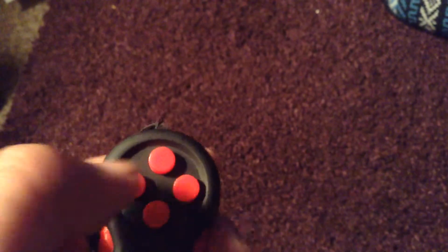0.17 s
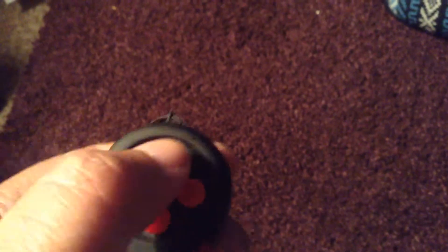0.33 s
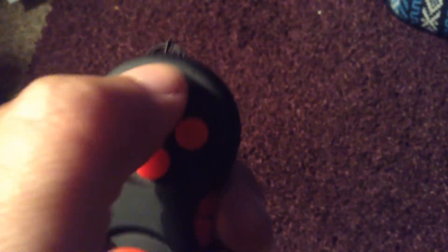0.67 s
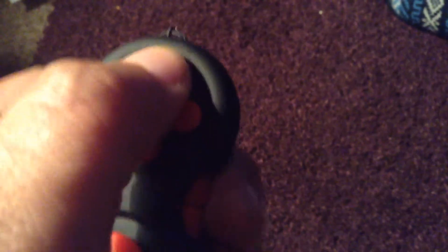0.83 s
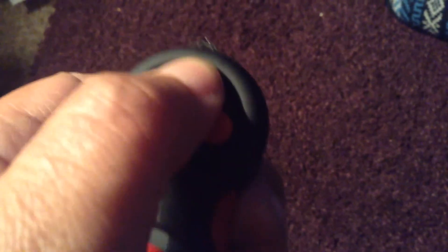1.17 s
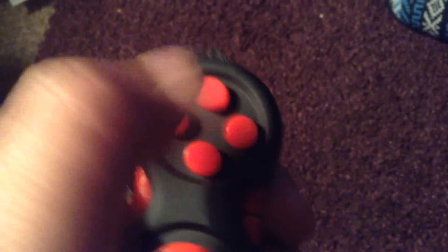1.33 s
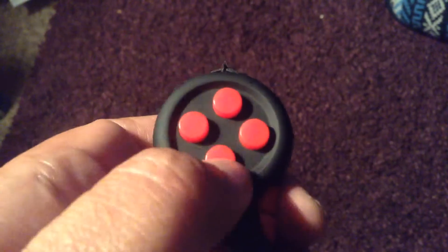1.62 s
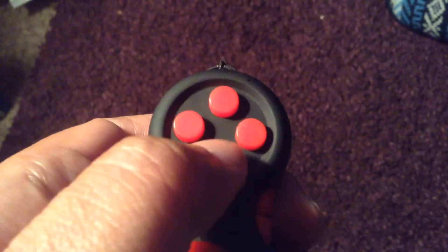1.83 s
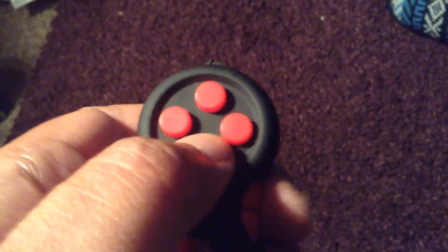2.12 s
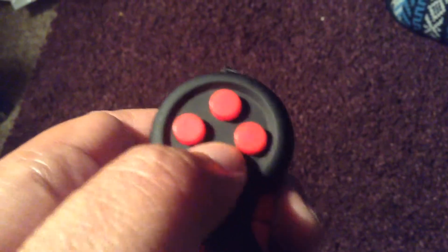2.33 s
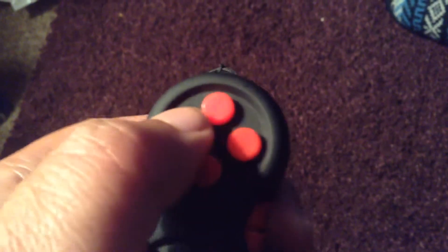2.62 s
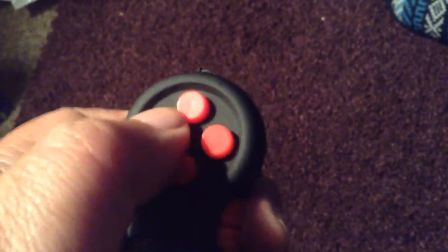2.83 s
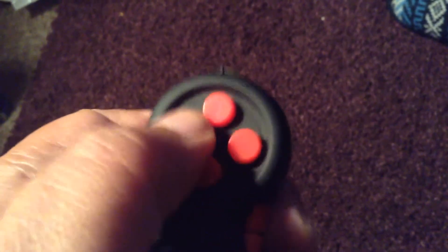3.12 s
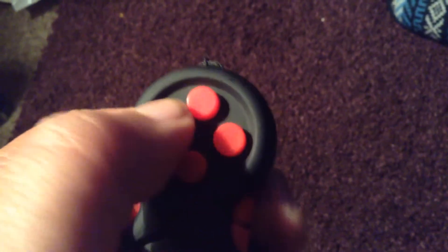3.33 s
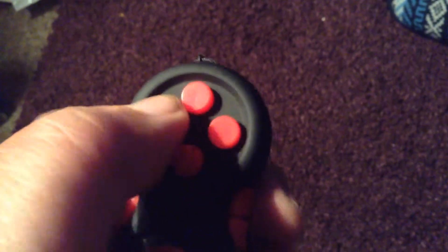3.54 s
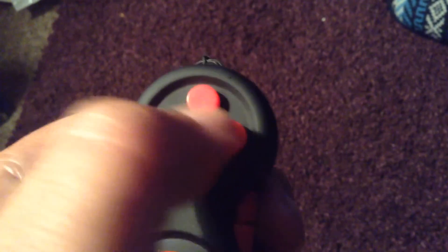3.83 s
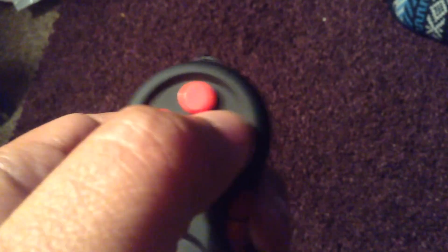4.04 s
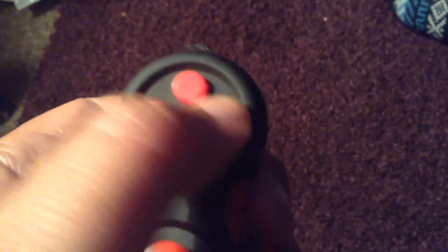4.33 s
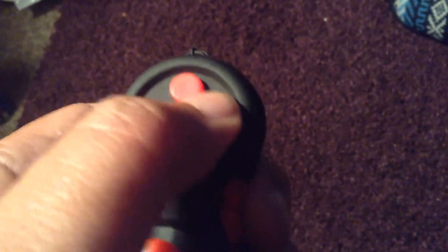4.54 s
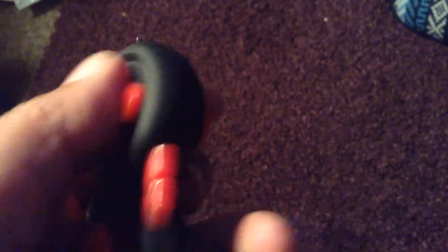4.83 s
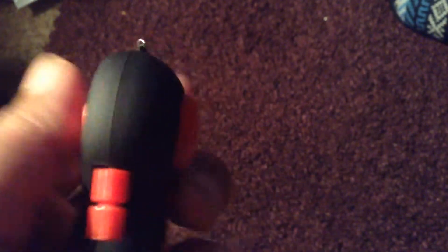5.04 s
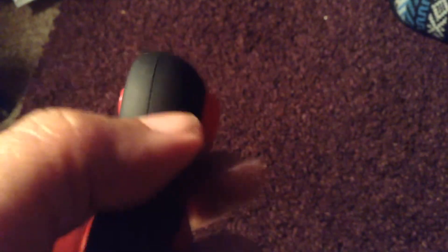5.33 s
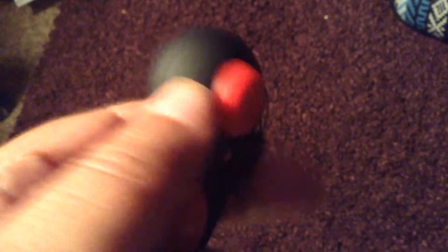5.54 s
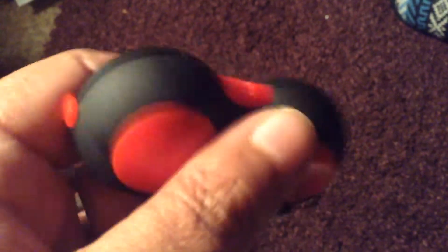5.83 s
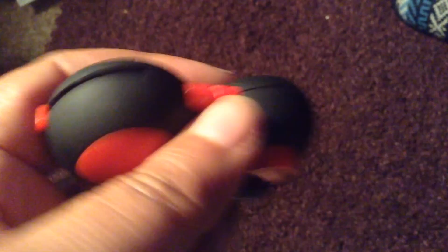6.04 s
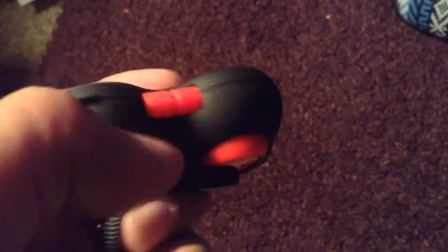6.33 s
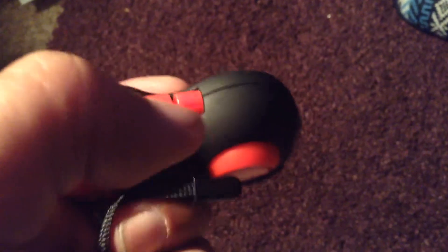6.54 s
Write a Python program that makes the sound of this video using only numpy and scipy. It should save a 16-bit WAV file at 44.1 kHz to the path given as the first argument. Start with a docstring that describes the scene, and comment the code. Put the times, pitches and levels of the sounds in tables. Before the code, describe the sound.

A thumb snaps the plastic buttons of a small hollow toy in sharp uneven clicks, with light ticks and skin rubs, in a quiet room.

```python
"""Fidget toy at close range

A thumb clicks the plastic buttons of a small hand-held toy, close to the microphone in a quiet carpeted room.
Each snap is a brief burst of chattering contact that rings the hollow case; buttons rocking in their seats
tick more lightly, and soft flesh lands on the toy. Skin slides on the case, mostly later on, and once the toy
is turned over its side controls click with hardly any thud. The room answers briefly over a soft steady hiss."""
import sys
import numpy as np
from scipy import signal
from scipy.fft import rfft, irfft, next_fast_len
from scipy.io import wavfile
from scipy.ndimage import uniform_filter1d

SR = 44100
rng = np.random.default_rng(int(sys.argv[2]) if len(sys.argv) > 2 else 0)


def pcm_store(signal):
    """Save signal as 16-bit PCM."""
    levels = np.round(np.clip(np.atleast_2d(signal), -1, 1) * 32767)
    wavfile.write(sys.argv[1], SR, levels.astype(np.int16).T)


N = 294588  # samples
SIZE = 2048  # samples in a short impulse response
HZ = np.fft.rfftfreq(SIZE, 1 / SR)

# steady hiss at the microphone, spectral shape: pitch_hz, relative level_db per Hz
HISS_SHAPE = [(15, -49.5), (25, -47.5), (151, -8), (182, -3), (226, -3), (366, -6), (442, -8.5),
              (492, -6.5), (548, -8.5), (1070, -9.5), (2600, -14), (4450, -14.5), (8710, -16), (13400, -15),
              (15300, -19.5)]
HISS_DB = -65.5  # rms
TOP_HZ = 15330  # middle of the recorder's upper band edge

# diffuse room decay: pitch_hz, t60_s
ROOM_DECAY = [(200, 0.094), (2500, .24), (7000, 0.16), (14000, 0.17)]
# colour of the diffuse answer, before each source's own room level: pitch_hz, level_db
ROOM_COLOUR = [(200, -20.5), (1000, -13), (2700, -20), (4200, -15), (6000, -8.5), (9000, -13),
               (13500, -7.5)]
# near surfaces that reflect a click: delay_s, level_db against the direct sound
WALLS = [(.0046, -26), (0.0082, -30), (0.0132, -26.5)]
BEAM_HZ = 5000  # above this the small parts beam their sound, and their peaks even out over all directions

# resonances, grouped by the part likely to ring, from the whole toy down to the smallest piece of a button
# each: pitch_hz, width_hz, relative level_db
THUD = [(263, 245, 1), (645, 460, -2.5)]
HOLLOW = [(1356, 370, -8.5), (2057, 517, 2)]
SHELL = [(2716, 580, 1.37), (3470, 1070, -2.5)]
RIM = [(4290, 553, -12), (5440, 1930, -2)]
CAP = [(8370, 3000, 0)]
STEM = [(10464, 800, 0.027)]
SPRING = [(12450, 850, 0.17)]
CATCH = [(14550, 500, 0)]
# thin ring of the plastic that outlasts a blow: pitch_hz, level_db against the blow, t60_s
RING = [(1727, -60, 0.11), (2490, -69, 0.11), (5580, -52, 0.094), (6080, -51, 0.086), (6150, -39, 0.058),
        (7080, -65, .13), (7100, -56.5, .12), (8940, -53, 0.15), (10920, -51.5, 0.07), (12600, -52, 0.0964)]

# the thumb's soft pad settling on a button: middle_s, level_db
PADS = [(3.07, -69), (3.335, -64), (3.589, -62.5), (3.65, -63), (4.461, -66.5)]
PAD_S = 0.012  # half length of that soft bump

# skin sliding on the case: middle_s, half_length_s, case_pitch_hz, case_level_db, hiss_level_db
SLIDES = [(.51, 0.013, 1930, -63, -82), (1.343, 0.011, 2400, -52.5, -72), (3.637, 0.013, 2040, -70, -73),
          (4.416, 0.025, 2080, -63.5, -62.5), (4.653, 0.022, 2100, -59.5, -64.5),
          (4.722, 0.021, 2620, -64, -59.5), (4.916, 0.017, 2870, -61, -51.5),
          (5.007, 0.032, 1990, -78, -60.5), (5.28, 0.015, 1990, -55, -58.5),
          (5.494, 0.092, 2950, -74.5, -62.5), (5.566, 0.0043, 2060, -60.5, -70),
          (5.844, 0.035, 2050, -67, -55.5), (5.868, 0.0057, 2300, -57.5, -63)]
# friction hiss, spectral shape: pitch_hz, relative level_db per Hz
SKIN = [(1500, -12), (2500, -0.5), (3600, -4), (5500, -9), (9000, -3), (14000, -3), (16000, -1)]

# buttons rocking in their seats: start_s, case_db, treble_db against the case
TICKS = [(.283, -24.5, -14), (0.374, -20.5, -18), (0.5091, -34, -24), (0.73, -21, -20),
         (0.8358, -16.5, -18), (1.29, -14, -26), (1.304, -23.5, -19), (1.3375, -1, -10.5),
         (1.3967, -17, -23), (1.483, -24, -10), (1.946, -30, -1.5), (2.2209, -14, -19), (2.2798, -9.5, -8),
         (2.4883, -24, -16), (2.5129, -7.5, -6), (2.7327, -13, -23), (3.075, -15.5, -7.5),
         (3.0878, -11.5, -13), (3.1141, -16.5, -3), (3.1684, -5, -19), (3.3453, -15, -7),
         (3.3578, -7.5, -4), (3.4221, -8.5, -16), (3.596, -18.5, -12.5), (3.6336, -9, -21),
         (3.6437, -12.5, -7), (3.8466, -16.5, -1.5), (5.288, -18.5, -16), (4.217, -22, -22),
         (4.399, -12.5, -30), (4.4122, -12, -17.5), (4.4307, -12, -13), (4.4511, -11, -21),
         (4.469, -15.5, -13.5), (4.638, -10, -4), (4.6495, -18, -7), (4.6789, -16.5, -11),
         (4.7205, -16.5, -22), (4.8616, -20.5, -10.5), (4.9903, -21, -12), (5.049, -27, -1.5),
         (5.401, -14.5, -14), (5.53, -25.5, 2), (5.617, -19, -4), (5.7327, -24, -0.5), (5.865, -11, -1),
         (6.0435, -19, -5.5), (6.1845, -23.5, -17)]
TICK_GRIP, GRIP_SCATTER = 0.98, 0.013  # pitch ratio of the case under a light touch, and its spread
TICK_THUD_DB, TICK_THUD_GROWS = -23, 0.293  # thud of a tick, and its dB per dB of the case
# faint ticks stirred up by a slide: blow over its case level, spread, treble against the case
JOSTLE_DB, JOSTLE_SCATTER_DB, JOSTLE_TREBLE_DB = 35, 6, -20

# buttons snapping down or up: start_s, case_db, button_db, grip (pitch ratio of the case),
# lean_db (shell over hollow), hardness (treble slope, dB per octave), catch_db against the button
SNAPS = [(0.8737, 9, 7, 0.87, 1.5, 1, 3), (0.9982, -2.5, -14.5, 1.02, 7.5, -10.5, 5),
         (1.0717, 6.5, 3.5, 0.97, -7.5, -4, 6.5), (1.1567, 8, 9, 0.87, 13, -3.5, 5.5),
         (1.3143, 6.5, 11, 1.054, -1.5, 7.5, 0), (2.034, 10.5, 7.5, 1.004, 9, 0.5, 5.5),
         (2.231, -1.5, 10.5, 0.92, 20.5, -0.5, 6), (2.341, 11, 3, 0.95, 9, 10, 5),
         (2.4977, 1, 5, 0.87, 10, 0, 8), (2.7704, -15.5, -7.5, 0.95, -3.5, -0.5, -4),
         (3.1817, -2.5, 5.5, 0.97, 0.5, 1, -5), (3.4378, -6, -3, 0.99, 5.5, 0.5, 4),
         (3.7979, -9, -8.5, 0.93, -7, 3, -14.5), (3.802, -8.5, -10.5, .98, 3.5, 2.5, -10),
         (3.85, -3, -9, 0.92, -2, 17, -12), (5.2955, 8, 5.5, 1.023, -4.5, 18, -14),
         (6.1173, -2.5, -13.5, 0.98, 4, -17, -26)]
# shares of rim, cap, stem and spring in a snap: level_db of each
BUTTON_DB = [-2, 0.5, 2.5, 3.5]
# the same shares for the side controls: level_db of each
SIDE_DB = [-8.5, 3.5, -4, -2]
PIVOT_HZ = 9700  # hardness tilts the button's parts about this frequency
PART_SCATTER = 0.035  # spread in pitch ratio of the small parts from snap to snap
# t60 of the chatter at a case level of 0 dB; its change in dB per dB of the case: firm snaps seat sooner
CHATTER_S, CHATTER_DB = 0.01, -0.32
THUD_DB, THUD_SHARE = -13, 0.67  # thud against the blow; how much of it follows the case rather than the button
THUD_LEAN = 0.25  # dB of thud per dB of lean: a press square on the shell also shoves the whole toy
TURNED_S, SIDE_THUD_DB = 4.75, -23  # snaps after this come from the side controls; change in their thud
SIDE_ROOM_DB = -2.5  # the side controls face the microphone, so less of the room is heard


def amp(db):
    """Decibels to gain."""
    return 10 ** (np.asarray(db) / 20)


def unit(x):
    """Scale to rms 1."""
    return x / np.sqrt(np.mean(x ** 2) + 1e-20)


def along(points, hz):
    """(Hz, value) points joined on a log frequency axis."""
    f, v = np.transpose(points)
    return np.interp(np.log(hz + 1), np.log(f), v)


def filtered(x, response):
    """x times a response of frequency."""
    m = next_fast_len(len(x) + 4 * SIZE)
    spectrum = rfft(x, m) * response(np.fft.rfftfreq(m, 1 / SR))
    return irfft(spectrum, m)[:len(x)]


def add(track, s, sound):
    """Mix a sound into the track from time s."""
    start = round(s * SR)
    track[start:start + len(sound)] += sound[:len(track) - start]


def background():
    """Low room noise and microphone hiss: steady noise with one fixed spectrum."""
    noise = rng.standard_normal(N)
    return amp(HISS_DB) * unit(filtered(noise, lambda f: amp(along(HISS_SHAPE, f))))


def causal(gain):
    """The minimum-phase response with this gain, which rings only after the blow."""
    cepstrum = irfft(np.log(np.maximum(gain, 1e-6)))
    cepstrum[1:SIZE // 2] *= 2
    cepstrum[SIZE // 2 + 1:] = 0
    return np.exp(rfft(cepstrum))


def all_round(colour):
    """The colour that the room receives: the treble peaks are averaged over all directions."""
    smooth = np.abs(uniform_filter1d(colour ** 2, size=101))
    share = 1 / (1 + (BEAM_HZ / (HZ + 1)) ** 8)
    return np.sqrt(share * smooth + (1 - share) * colour ** 2)


def in_room(click, radiated, build_s=0.0018):
    """The click and its first reflections; the diffuse tail answers to the colour radiated in all directions."""
    hz, t, z = signal.stft(rng.standard_normal(SR // 3), SR, nperseg=128)
    decay = amp(-60 * t / along(ROOM_DECAY, hz)[:, None])
    tail = signal.istft(z * decay, SR, nperseg=128)[1]
    tail *= 1 - np.exp(-(np.arange(len(tail)) / SR / build_s) ** 2)
    tail /= np.linalg.norm(tail)
    colour = irfft(causal(radiated * amp(along(ROOM_COLOUR, HZ))))
    answer = signal.fftconvolve(tail, colour)
    add(answer, 0, click)
    for delay_s, db in WALLS:
        add(answer, abs(delay_s + rng.normal(0, 0.0002)), amp(db) * click)
    return answer


def resonances(modes, hz):
    """Power response of steep-sided resonances."""
    power = 0
    for centre, width, db in modes:
        detuning = (hz * hz - centre * centre) / (width * hz + 1e-6)
        power = power + amp(db) ** 2 / (1 + detuning ** 2) ** 2
    return power


def gripped(modes, grip):
    """A pitch ratio, such as the hold of the hand gives, shifts resonances and their widths together."""
    return [(hz * grip, width * grip, db) for hz, width, db in modes]


def ring(colour):
    """A few lightly damped modes take their share of each blow."""
    t = np.arange(SR // 5) / SR
    chance = rng.standard_normal((len(RING), 2))
    sound = np.zeros(len(t))
    for (hz, db, t60), (luck, phase) in zip(RING, chance):
        envelope = amp(db + 2 * luck - 60 * t / t60)
        sound += np.interp(hz, HZ, colour) * envelope * np.sin(2 * np.pi * (hz * t + phase))
    return sound


def contact(t60, rise, impact_db):
    """Spectrum of one hard impact inside a short burst of chatter: rippled, but level on the whole."""
    t = np.arange(SIZE) / SR
    shape = (1 - np.exp(-t / rise)) * amp(-60 * t / t60)
    burst = shape * rng.standard_normal(SIZE) / np.linalg.norm(shape)
    burst[round(2 * rise * SR)] += amp(impact_db)
    spectrum = rfft(burst)
    smooth = np.abs(uniform_filter1d(np.abs(spectrum) ** 2, size=55))
    return spectrum * causal(1 / np.sqrt(smooth + 1e-9))


def struck(parts, levels_db, blow, room_db, push_db=-19, push_hz=160):
    """A blow rings each part at its own strength; the whole toy also gives a small low push."""
    power = sum(amp(db) ** 2 * resonances(part, HZ) for part, db in zip(parts, levels_db))
    push = amp(levels_db[0] + push_db) ** 2 / (1 + (HZ / push_hz) ** 2)
    colour = np.sqrt(power + push)
    fade = np.cos(np.pi / 2 * np.arange(SIZE) / SIZE)
    click = fade * irfft(blow * causal(colour))
    sound = in_room(click, amp(room_db) * all_round(colour))
    add(sound, 0, ring(colour))
    return sound


def pads(upper_db=-4):
    """Soft flesh lands slowly and stirs only the lowest resonances of the toy."""
    t = np.arange(N) / SR
    modes = [THUD[0], (*THUD[1][:2], upper_db)]
    rumble = unit(filtered(rng.standard_normal(N), lambda f: np.sqrt(resonances(modes, f))))
    landings = sum(amp(db) * np.exp(-0.5 * ((t - s) / PAD_S) ** 2) for s, db in PADS)
    return rumble * landings


def slides(slips_a_second=400, grain_db=5, width_hz=340, overtone=1.34, overtone_db=-10):
    """Skin catches in many tiny slips that ring the case where it is touched and hiss above it."""
    track = np.zeros(N)
    for s, half, ring_hz, case_db, hiss_db in SLIDES:
        t = np.arange(SR // 2) / SR - 1 / 4
        stroke = np.exp(-0.5 * (t / half) ** 2)
        chance = rng.random(len(t))
        size, noise, swell = rng.standard_normal((3, len(t)))
        slips = unit((chance < slips_a_second / SR) * size)
        modes = [(ring_hz, width_hz, 0), (ring_hz * overtone, 2 * width_hz, overtone_db)]
        case = unit(filtered(slips, lambda f: np.sqrt(resonances(modes, f))))
        friction = unit(noise * amp(grain_db * swell)) + 0.227 * slips
        hiss = unit(filtered(friction, lambda f: amp(along(SKIN, f))))
        add(track, max(s + t[0], 0), stroke * (amp(case_db) * case + amp(hiss_db) * hiss))
    return track


def jostled(count=2):
    """A few faint ticks scattered around the middle of each slide, louder where it rubs harder."""
    faint = []
    for s, half, _, case_db, _ in SLIDES:
        for when, luck in rng.standard_normal((count, 2)):
            level_db = case_db + JOSTLE_DB + JOSTLE_SCATTER_DB * luck
            faint.append((s + half * when, level_db, JOSTLE_TREBLE_DB))
    return faint


def ticks(soft_db=-7, stem_db=-1):
    """Loose buttons knock against their seats under the thumb, too softly to wake the top of the shell much."""
    track = np.zeros(N)
    case = HOLLOW + [SHELL[0], (*SHELL[1][:2], soft_db)]
    for s, case_db, treble_db in TICKS + jostled():
        grip = TICK_GRIP + GRIP_SCATTER * rng.standard_normal()
        parts = [THUD, gripped(case, grip), RIM + CAP, STEM + SPRING]
        thud_db = TICK_THUD_DB + TICK_THUD_GROWS * case_db
        small_db = case_db + treble_db
        levels_db = [thud_db, case_db, small_db, small_db + stem_db]
        blow = contact(0.019, rise=0.00022, impact_db=-0.5)
        add(track, s, struck(parts, levels_db, blow, room_db=3))
    return track


def snaps(room_db=-2.5):
    """The button springs buckle; the grip tunes the case, and a harder contact favours the smallest parts."""
    track = np.zeros(N)
    button = [RIM, CAP, STEM, SPRING, CATCH]
    octaves = np.log2([part[0][0] / PIVOT_HZ for part in button])
    for s, case_db, button_db, grip, lean_db, hardness, catch_db in SNAPS:
        side = s > TURNED_S
        thud_db = THUD_DB + button_db + THUD_SHARE * (case_db - button_db)
        thud_db += THUD_LEAN * lean_db + SIDE_THUD_DB * side
        shares_db = [*(SIDE_DB if side else BUTTON_DB), catch_db]
        small_db = button_db + hardness * octaves + shares_db
        parts = [THUD, gripped(HOLLOW, grip), gripped(SHELL, grip)]
        parts += [gripped(part, 1 + PART_SCATTER * rng.standard_normal()) for part in button[:-1]]
        parts += [CATCH]
        levels_db = [thud_db, case_db - lean_db / 2, case_db + lean_db / 2, *small_db]
        blow = contact(CHATTER_S * amp(CHATTER_DB * case_db), rise=0.0001, impact_db=-2.5)
        add(track, s, struck(parts, levels_db, blow, room_db + SIDE_ROOM_DB * side))
    return track


def scene():
    """The toy in the quiet room, one channel."""
    return (background() + pads() + slides() + ticks() + snaps())[None]


def record(dry):
    """The recorder keeps nothing above its band edge, a ramp 300 Hz wide."""
    roll_off = lambda f: np.clip((TOP_HZ - f) / 300 + 0.5, 0, 1)
    return filtered(dry[0], roll_off)[None]


dry = scene()
out = record(dry)
pcm_store(out)
```